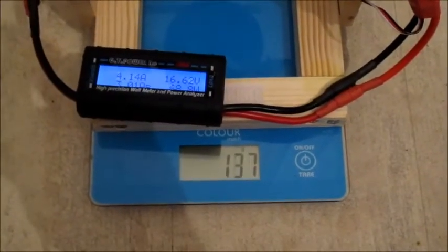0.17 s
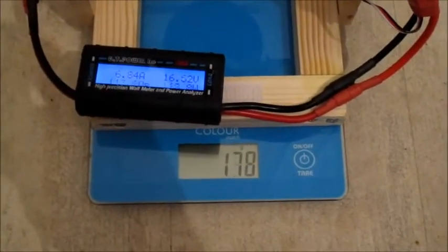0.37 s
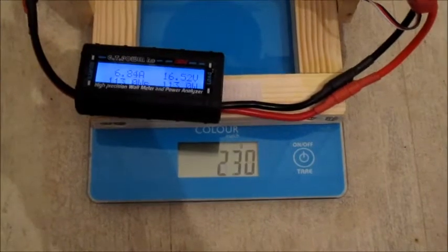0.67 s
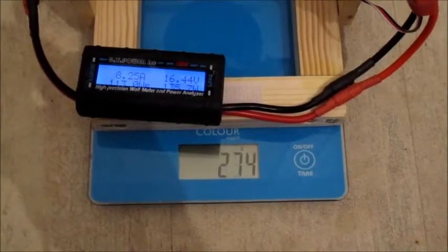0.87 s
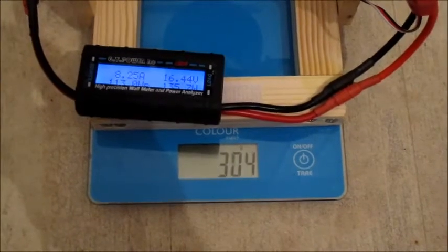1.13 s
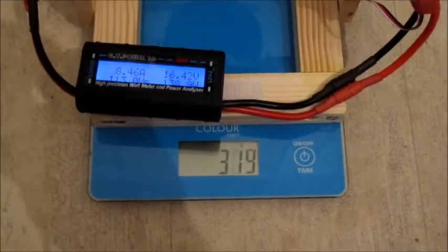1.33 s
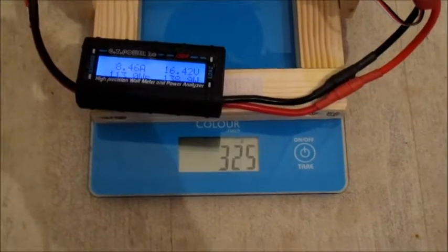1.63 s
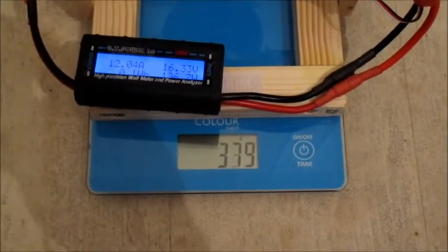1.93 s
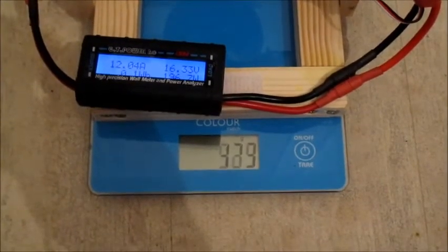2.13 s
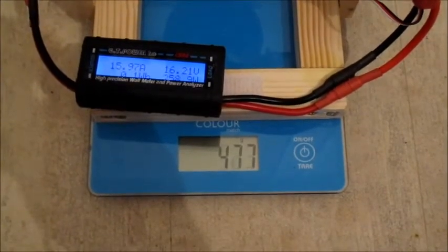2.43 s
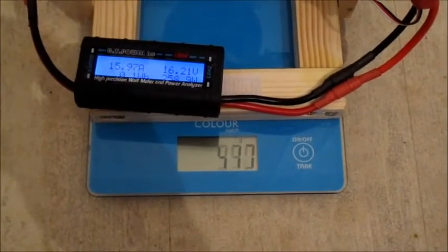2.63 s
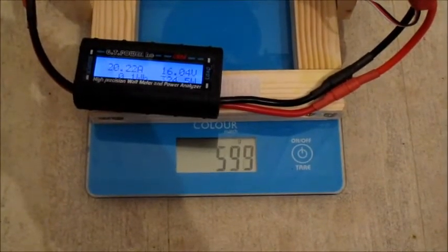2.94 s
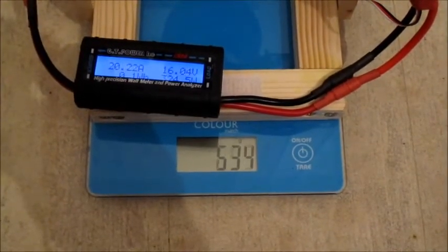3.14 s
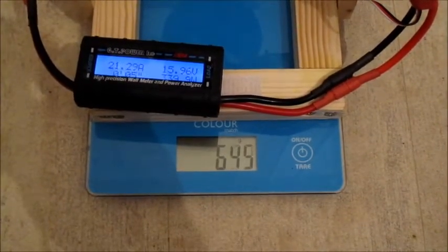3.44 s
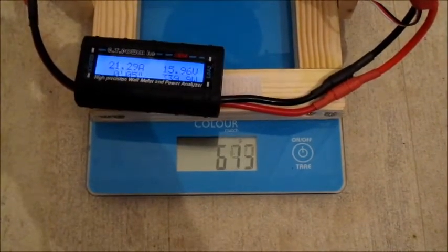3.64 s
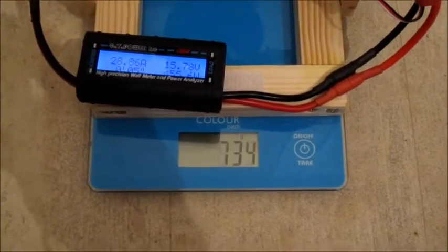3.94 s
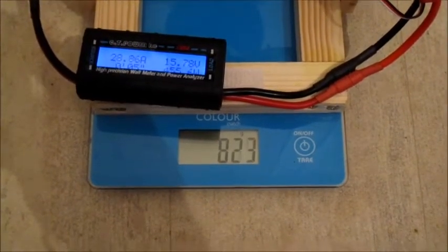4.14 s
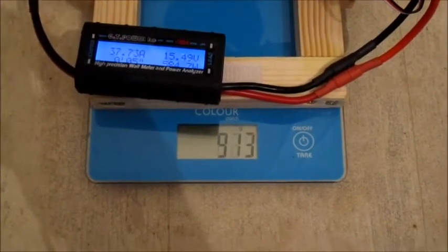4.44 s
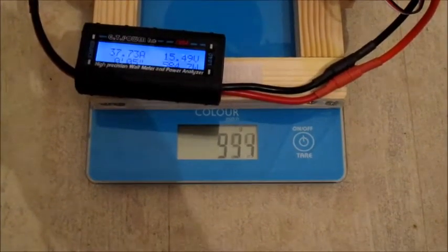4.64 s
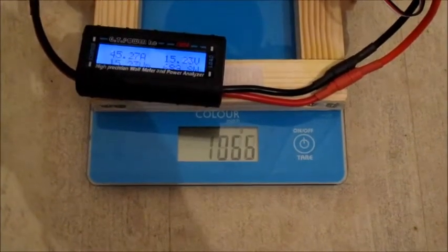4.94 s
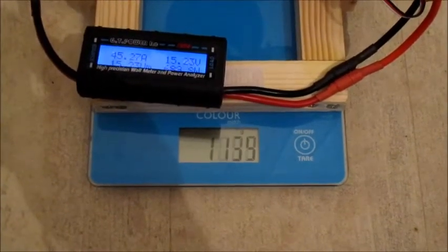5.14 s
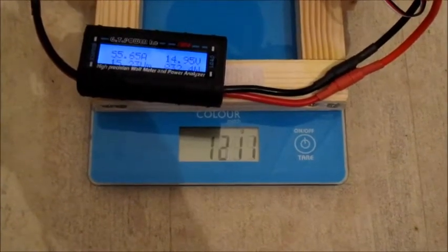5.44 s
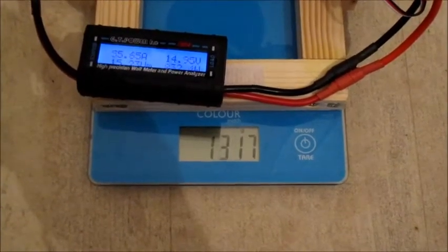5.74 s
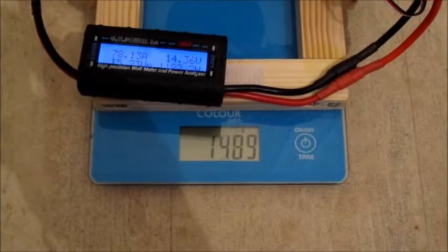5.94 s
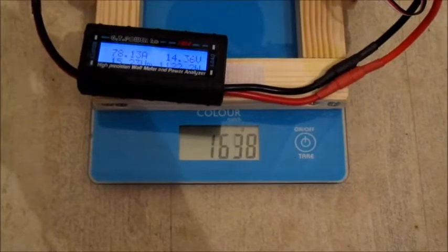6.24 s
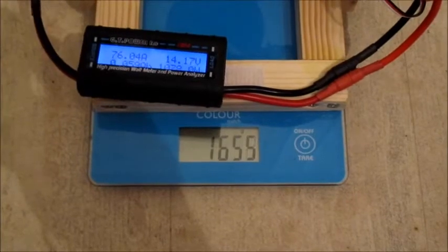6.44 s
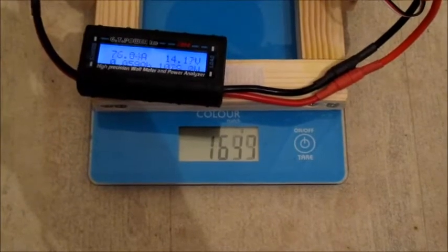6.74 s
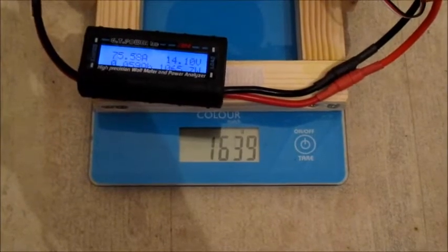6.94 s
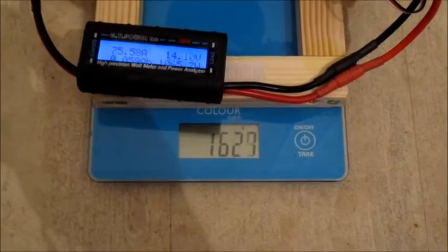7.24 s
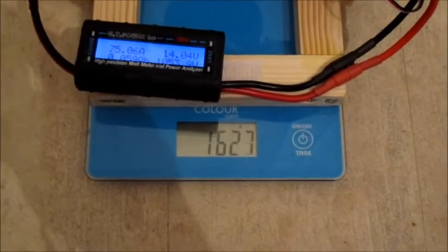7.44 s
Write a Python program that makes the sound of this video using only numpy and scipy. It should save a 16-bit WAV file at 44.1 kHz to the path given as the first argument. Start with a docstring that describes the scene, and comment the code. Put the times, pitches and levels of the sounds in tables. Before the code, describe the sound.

A small electric ducted fan on a wooden stand, heard close in a small room, is already running at the start, with a whine near 1.9 kHz, a lower hum near 375 Hz and bright, breathy hiss. It rises and pauses around 0.8-1.2 s, while a coarse metallic buzz rattles the stand from 0.4 to 1.9 s; a tiny dip passes at 0.6 s. The pitch climbs in surges to about 3 kHz, nearly levelling at 2.6-3 s, with a softer buzz from 2.3 to 3.3 s. From 3.2 s it glides upward continuously, a faint sliding whistle showing at 3.5-3.8 and 4.1-4.5 s. Air roar swells and the final push at 5.1-5.5 s lifts the whine to nearly 5 kHz above a hum near 1 kHz. It then holds, shrill, fluttering slightly, with dense hiss and rushing jet, until 7.6 s, without winding down.

```python
"""Ducted fan on a test stand

A five-blade electric ducted fan is throttled up unevenly on a wooden stand, then held near full speed.
The rotor sums tones at multiples of its shaft rate: an imbalance hum, a blade-passing whine and side tones.
Shaped noise makes the hiss of the duct and the roar of the jet, both following the speed or its own level.
In the early part the stand buzzes once a turn; later the speed controller whistles faintly, twice.
A close microphone hears it in a small room, whose walls return echoes of the whine and the buzz."""
import sys
import numpy as np
from scipy import signal
from scipy.fft import rfft, irfft
from scipy.io import wavfile
from scipy.ndimage import uniform_filter1d

SR = 44100
rng = np.random.default_rng(int(sys.argv[2]) if len(sys.argv) > 2 else 0)


def wav_record(signal):
    """Record a signal, one row per channel, as 16-bit PCM in the file named by sys.argv[1]."""
    frames = np.transpose(np.atleast_2d(signal))
    bounded = np.clip(frames, -1, 1)
    # unit amplitude maps onto the largest positive 16-bit level
    quanta = np.round(bounded * 32767).astype(np.int16)
    wavfile.write(sys.argv[1], SR, quanta)


N = 335160
TIME = np.arange(N) / SR
FREQS = np.fft.rfftfreq(N, 1 / SR)

BLADES = 5
FULL_SPEED_HZ = 996  # reference shaft rate, turns a second

# Shaft speed. Each row: time in seconds, turns a second.
SHAFT_SPEED = [(0, 375.1), (0.2, 403.6), (0.48, 429.4), (0.82, 440.9), (1.22, 442.7), (1.39, 474.5),
               (1.58, 486.3), (1.93, 528.1), (2.07, 554.7), (2.21, 565.8), (2.35, 591.1), (2.57, 612.6),
               (2.89, 616.0), (3.18, 632.0), (3.43, 663.4), (3.54, 686.9), (3.86, 731.8), (4.56, 820.8),
               (4.83, 842.0), (5.08, 873.5), (5.36, 940.5), (5.52, 994.4), (5.95, 995.5), (6.4, 989.6),
               (6.75, 989.4), (7.1, 984.5), (7.6, 989.1)]
# Hum of the rotor's imbalance, once a turn. Each row: time in seconds, level in dB.
IMBALANCE_HUM = [(0.0, -16), (0.73, -24.5), (1.22, -26.5), (1.33, -15.0), (1.43, -28.4), (1.67, -19.8),
                 (2.33, -36.6), (3.21, -22.7), (3.55, -30.5), (3.62, -25.3), (3.73, -31.1), (4.44, -21.6),
                 (4.53, -25), (4.74, -19.3), (5.05, -24.5), (5.22, -18.5), (5.65, -14.5), (7.6, -15)]
# Whine at the blade-passing rate. Each row: time in seconds, level in dB.
BLADE_WHINE = [(0, -29.5), (0.3, -17.5), (0.67, -18.5), (0.8, -16), (1.2, -18), (1.35, -24.5), (1.65, -18),
               (1.86, -21.5), (2.2, -11.3), (2.5, -17), (2.95, -13.8), (3.65, -21.5), (4.45, -17),
               (4.56, -21.5), (4.8, -16.1), (5.3, -19), (5.52, -12), (6.05, -11), (6.5, -15), (7.6, -15)]
# Second harmonic of the whine. Each row: time in seconds, level in dB.
SECOND_HARMONIC = [(0.0, -22), (0.28, -36), (1.61, -30.5), (2.11, -36.5), (4.04, -25.5), (4.11, -21),
                   (6.04, -24.5), (6.27, -19.5), (7.6, -20)]
# Third harmonic of the whine. Each row: time in seconds, level in dB.
THIRD_HARMONIC = [(0, -40), (0.15, -28), (0.7, -36.5), (1.6, -35), (2.3, -41), (3.0, -33), (5.0, -31.5),
                  (5.5, -38), (7.0, -33)]
# Common level of the side tones from blades not quite alike. Each row: time in seconds, level in dB.
UNEVEN_BLADES = [(0, -26), (0.5, -38), (1.9, -24.5), (2.9, -25), (4.1, -32), (5, -26.5), (5.6, -22.5),
                 (7.0, -21.5), (7.6, -28)]
# Pattern of those side tones. Each row: multiple of the shaft rate, dB against the common level.
UNEVEN_ORDERS = [(2, -15.5), (3, -16.5), (4, -4.5), (6, -7), (7, -28)]
# Side tones round the second harmonic. Each row: multiple of the shaft rate, dB against that harmonic.
UPPER_ORDERS = [(9, -14), (11, -15)]

# Buffeting of the jet. Each row: time in seconds, level in dB.
JET_BUFFETING = [(0, -39), (0.8, -46), (1.75, -47.5), (2.05, -40), (3.1, -41.5), (3.8, -32), (4.2, -37.5),
                 (4.6, -34), (7.6, -35)]
# Flow of air through the duct. Each row: time in seconds, level of the hiss in dB.
DUCT_FLOW = [(0.0, -20), (0.65, -22), (1.1, -22.5), (1.39, -22), (1.58, -24), (2.1, -22), (2.19, -24),
             (3.38, -22), (3.61, -20), (5.47, -18.5), (5.56, -18.5), (7.6, -18.5)]
# Spectrum of the buffeting. Each row: frequency in Hz, density in dB per Hz against the layer's level.
RUMBLE_SPECTRUM = [(10, -55), (25, -40), (50, -38), (90, -21.5), (150, -23), (220, -30.5), (400, -74),
                   (1000, -90)]
# Spectrum of the jet's roar. Each row: frequency in Hz, density in dB per Hz against the layer's level.
ROAR_SPECTRUM = [(60, -55), (140, -25.5), (210, -23.5), (320, -26), (600, -27), (1100, -27), (1900, -28.5),
                 (4000, -55), (16000, -74)]
# Spectrum of the duct's hiss. Each row: frequency in Hz, density in dB per Hz against the layer's level.
HISS_SPECTRUM = [(300, -52), (560, -54), (700, -46), (1100, -46.5), (1800, -45.5), (2400, -42.5),
                 (3300, -39), (4400, -39), (5500, -38.5), (7200, -39), (9600, -40.5), (11000, -51),
                 (16000, -62)]
# Spectrum of the highest hiss. Each row: frequency in Hz, density in dB per Hz against the layer's level.
FIZZ_SPECTRUM = [(7000, -61), (9500, -35), (11000, -34), (13000, -36), (15500, -40)]
# Resonances of the duct and stand. Each row: centre in Hz, width in Hz, peak in dB.
DUCT_MODES = [(640, 39, 6), (970, 120, 3), (1355, 120, 10.5), (2205, 266, 10), (2777, 290, 8.5),
              (6050, 120, 4), (8560, 730, 5)]

# Bouts of rattling in the stand. Each row: start in seconds, end in seconds,
# level of the second shaft multiple in dB before resonance, slope in dB per octave up the multiples.
RATTLES = [(0.408, 1.343, -32.5, -6), (1.337, 1.633, -34.5, -0.5), (1.56, 1.884, -32.5, -1),
           (2.253, 3.3, -42, -24)]
# Resonances of the stand. Each row: centre in Hz, width in Hz, peak in dB.
STAND_MODES = [(874, 28, 6), (1018, 23, 4), (1334, 20, 4.5), (1496, 480, 10.5), (1980, 60, 16),
               (2792, 110, 24), (3120, 91, 10), (3370, 350, 15.5), (3864, 190, 9.5), (4800, 180, 10),
               (5300, 300, 5.5)]
# Whistles of the speed controller. Each row: start in seconds, end in seconds, level in dB.
WHISTLES = [(3.513, 3.827, -42), (4.05, 4.55, -38.5)]
# Steady rumble of the room. Each row: frequency in Hz, density in dB per Hz.
ROOM_RUMBLE = [(10, -92), (28, -76), (55, -61.5), (90, -62), (200, -97), (1000, -110)]


def rotor(angle, walls):
    """Periodic forces at shaft and blade-passing rates; unequal blades fill in the other shaft multiples."""
    second_db, uneven_db = curve(SECOND_HARMONIC), curve(UNEVEN_BLADES)
    hum = shaft_tone(angle, curve(IMBALANCE_HUM), flutter=0.08)
    whine = gain_of(curve(BLADE_WHINE)) * echoing_tone(angle, walls, BLADES, flutter=0.14, flutter_hz=30)
    second = gain_of(second_db) * echoing_tone(angle, walls, 2 * BLADES, flutter=0.36, flutter_hz=28)
    third_gain = gain_of(curve(THIRD_HARMONIC))
    third = third_gain * echoing_tone(angle, walls, 3 * BLADES, flutter=0.32, flutter_hz=28)
    out = hum + whine + second + third
    for order, db in UNEVEN_ORDERS:
        out += shaft_tone(order * angle, uneven_db + db, flutter=0.43)
    for order, db in UPPER_ORDERS:
        out += shaft_tone(order * angle, second_db + db, flutter=0.6)
    return out


def shaft_tone(angle, db, flutter):
    """Rotating phasor: its real part is a tone, and slow random modulation makes it waver."""
    phasor = np.exp(1j * (angle + 2 * np.pi * rng.random()))
    wavering = phasor * (1 + flutter * eddies(7.2))
    return np.sqrt(2) * gain_of(db) * wavering.real


def echoing_tone(angle, walls, order, flutter, flutter_hz):
    """Interference: intake eddies shake a shaft multiple, and its echoes beat against it while it glides."""
    direct = np.exp(1j * (order * angle + 2 * np.pi * rng.random()))
    direct = direct * (1 + flutter * eddies(flutter_hz))
    # The duct beams treble past the microphone, so higher tones arrive more by way of the walls:
    # echo and direct sound are equal at 6600 Hz, and the echo gains 7 dB per octave.
    echo_db = 7 * np.log2(order * curve(SHAFT_SPEED) / 6600)
    heard = direct + gain_of(echo_db) * signal.oaconvolve(direct, walls)[:N]
    # dividing by the running power keeps the tone near unit rms
    power = uniform_filter1d(abs(heard) ** 2, size=6000)
    return heard.real * np.sqrt(2 / (power + 1e-9))


def jet():
    """Turbulent mixing: a buffeting rumble, and a roar that grows steeply with shaft speed."""
    buffeting = gain_of(curve(JET_BUFFETING)) * noise(RUMBLE_SPECTRUM)
    roar_db = by_speed(full_db=-32, db_per_octave=27)
    return buffeting + gain_of(roar_db) * noise(ROAR_SPECTRUM)


def duct_hiss(angle):
    """Flow noise in a resonant tube, with blades chopping turbulence into a band round their passing rate."""
    # fast flow damps the duct's resonances, so the hiss gets plainer with speed
    damped = np.clip(0.67 * (curve(SHAFT_SPEED) / FULL_SPEED_HZ) ** 3, 0, 1)
    resonant, plain = noise(HISS_SPECTRUM, DUCT_MODES), noise(HISS_SPECTRUM)
    hiss = np.sqrt(1 - damped) * resonant + np.sqrt(damped) * plain
    fizz_db = by_speed(full_db=-8.5, db_per_octave=3)  # against the hiss
    hiss += gain_of(fizz_db) * noise(FIZZ_SPECTRUM)
    chopped = (eddies(320) * np.exp(1j * BLADES * angle)).real
    hiss += gain_of(-6) * chopped
    gusts = gain_of(0.74 * eddies(2.7).real)
    return gain_of(curve(DUCT_FLOW)) * gusts * hiss


def stand(angle, walls):
    """Forced resonance: imbalance rattles the stand, and shaft multiples swell as they cross its modes."""
    fade_s, top_hz = 0.078, 5900
    speed, out = curve(SHAFT_SPEED), np.zeros(N)
    for order in range(2, 14):
        if order == BLADES:  # the blade whine covers this one
            continue
        drive = np.zeros(N)
        for start, end, db, tilt_db in RATTLES:
            drive += bout(start, end, fade_s) * gain_of(db + tilt_db * np.log2(order / 2))
        hz = order * speed
        rolloff = 1 / np.sqrt(1 + (hz / top_hz) ** 10)
        body = gain_of(lift_db(hz, STAND_MODES)) * rolloff
        out += drive * body * echoing_tone(angle, walls, order, flutter=0.14, flutter_hz=4.4)
    return out


def controller(angle):
    """Difference tone: motor commutation beats against controller switching in a faint, sliding whistle."""
    commutations, switching_hz, fade_s = 12, 7620, 0.08  # commutations a turn, Hz, seconds
    beat = commutations * angle - 2 * np.pi * switching_hz * TIME
    out = np.zeros(N)
    for start, end, db in WHISTLES:
        out += bout(start, end, fade_s) * shaft_tone(beat, db, flutter=0.77)
    return out


def dip():
    """Exponential recovery: the level drops at once, briefly, and creeps back."""
    start_s, depth_db, recovery_s = 0.625, -4.5, 0.06
    recovery = np.exp(-abs(TIME - start_s) / recovery_s)
    return gain_of(depth_db * (TIME >= start_s) * recovery)


def room(t60):
    """Reverberation: sparse random reflections decay by 60 dB in t60 seconds, with unit total energy."""
    t = TIME[:SR // 2]
    arrives = (rng.random(len(t)) < 2000 / SR) * (t > 0.003)  # about 2000 reflections a second
    taps = rng.standard_normal(len(t)) * arrives * gain_of(-60 * t / t60)
    return taps / np.linalg.norm(taps)


def noise(points, modes=()):
    """Spectral shaping: white noise is weighted to a density in dB per Hz, raised at each resonance."""
    hz, db = np.transpose(points)
    shape_db = np.interp(np.log(FREQS + 1), np.log(hz), db) + lift_db(FREQS, modes)
    return irfft(rfft(rng.standard_normal(N)) * gain_of(shape_db), N) * np.sqrt(SR / 2)


def eddies(width_hz):
    """Low-passed randomness: a complex wander of unit power, mostly slower than the given rate."""
    z = rng.standard_normal(N) + 1j * rng.standard_normal(N)
    z = signal.lfilter(*signal.butter(1, width_hz, fs=SR), z)
    return z / np.std(z)


def lift_db(hz, modes):
    """Resonance: each mode raises the level in dB by a bell-shaped peak about its centre."""
    return sum(peak / (1 + (2 * (hz - centre) / width) ** 2) for centre, width, peak in modes)


def by_speed(full_db, db_per_octave):
    """Power law: the level in dB rises by a fixed step for each doubling of shaft speed."""
    return full_db + db_per_octave * np.log2(curve(SHAFT_SPEED) / FULL_SPEED_HZ)


def curve(table):
    """Linear interpolation: rows of time and value become a value at every sample."""
    return np.interp(TIME, *np.transpose(table))


def bout(start, end, fade_s):
    """Trapezoidal envelope: fades in, holds, fades out."""
    return np.clip(np.minimum(TIME - start, end - TIME) / fade_s, 0, 1)


def gain_of(db):
    """Logarithmic level: decibels become an amplitude ratio."""
    return 10 ** (np.asarray(db) / 20)


def scene():
    """Superposition: one shaft angle drives every tone, and one microphone feeds both channels."""
    angle = 2 * np.pi * np.cumsum(curve(SHAFT_SPEED)) / SR
    walls = room(t60=0.22)
    fan = rotor(angle, walls) + jet() + duct_hiss(angle)
    fan += stand(angle, walls) + controller(angle)
    mono = fan * dip() + noise(ROOM_RUMBLE)
    return np.array([mono, mono])


def record(dry):
    """Saturation and band limit: the microphone input rounds off the highest peaks, then cuts the treble."""
    ceiling, edge_hz = 0.68, 15750
    # doubling the sample rate lessens aliasing from the rounding
    fine = signal.resample_poly(dry, 2, 1, axis=1)
    fine = fine / (1 + (fine / ceiling) ** 8) ** (1 / 8)
    rounded = signal.resample_poly(fine, 1, 2, axis=1)
    lowpass = signal.firwin(511, edge_hz, window=("kaiser", 9), fs=SR)
    return signal.oaconvolve(rounded, lowpass[None], "same")


dry = scene()
out = record(dry)
wav_record(out)
```